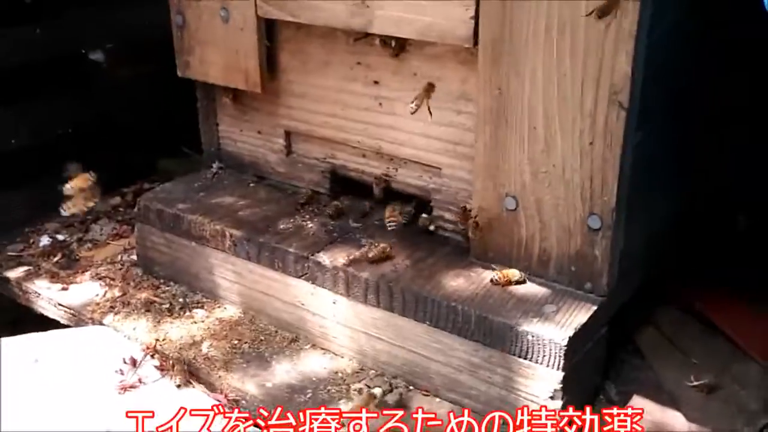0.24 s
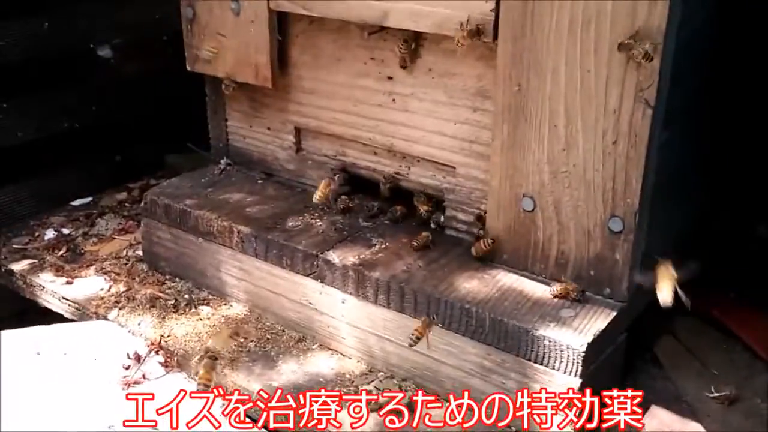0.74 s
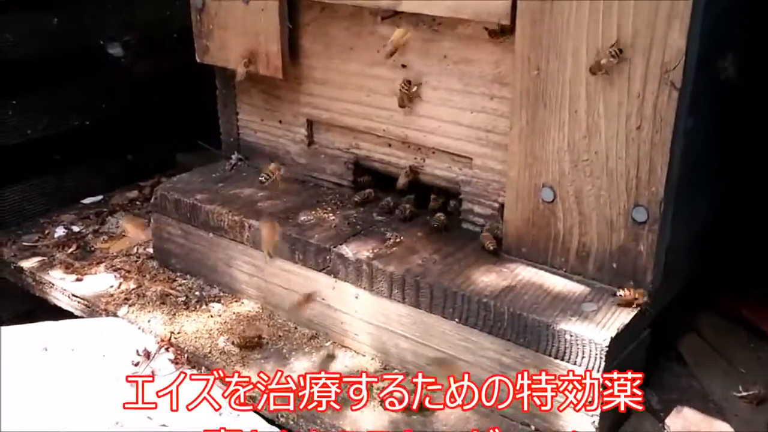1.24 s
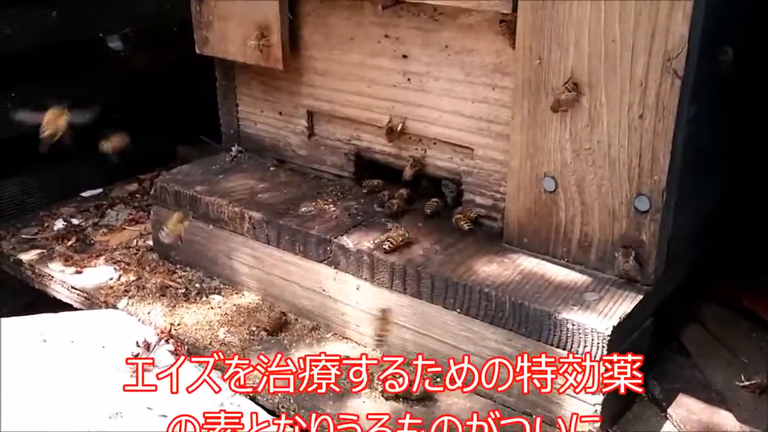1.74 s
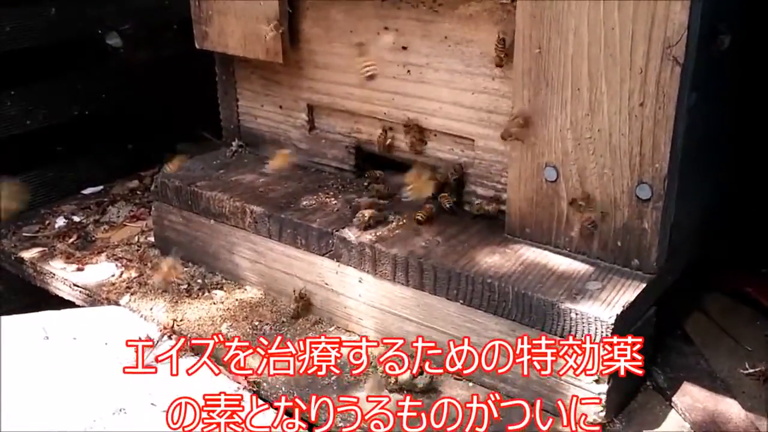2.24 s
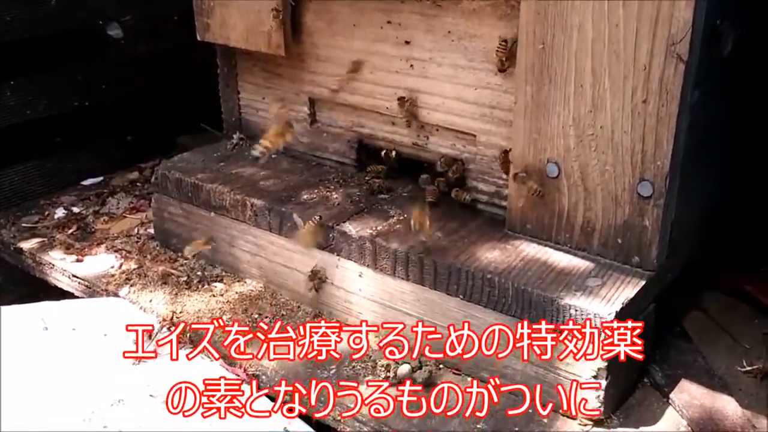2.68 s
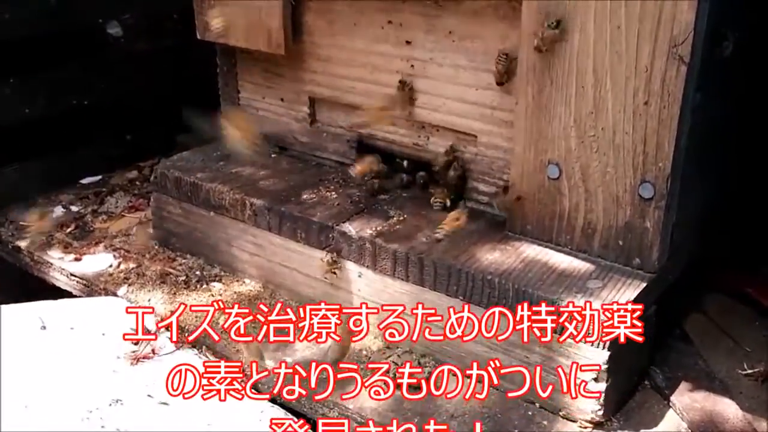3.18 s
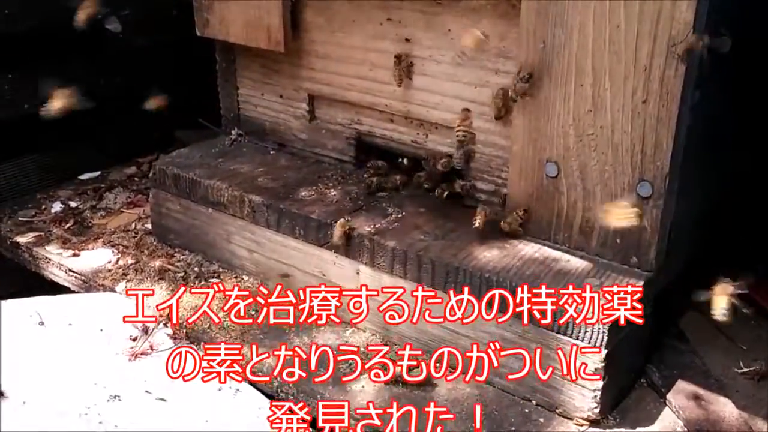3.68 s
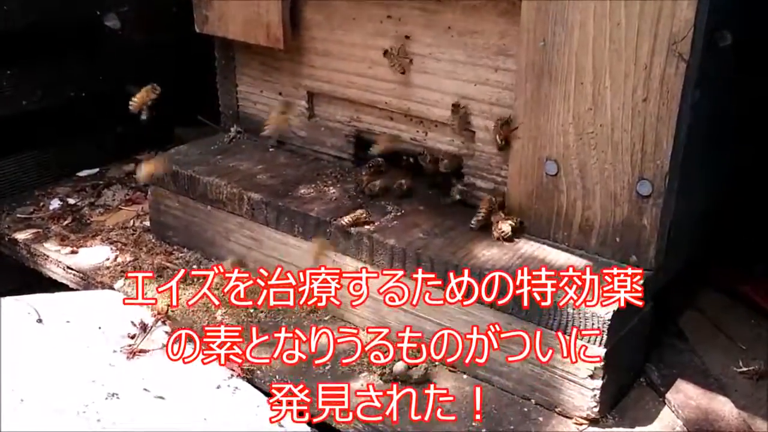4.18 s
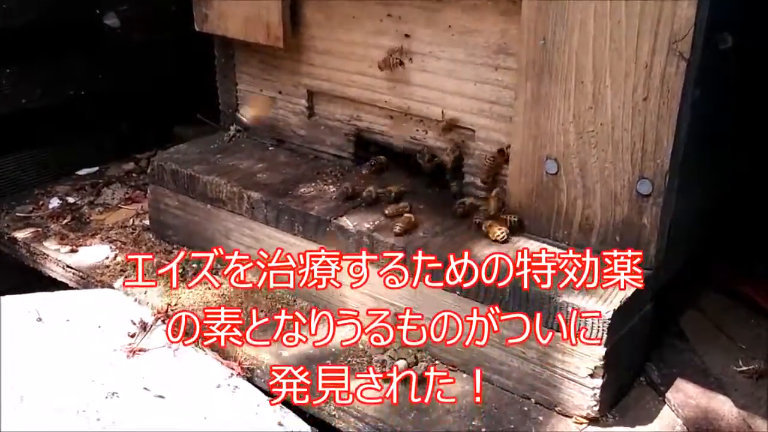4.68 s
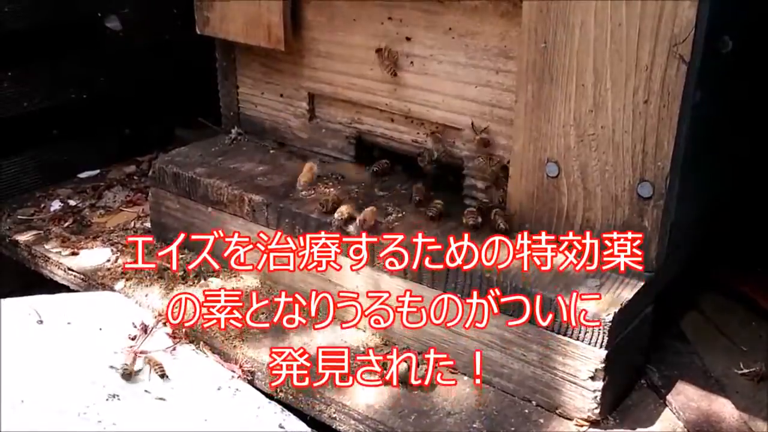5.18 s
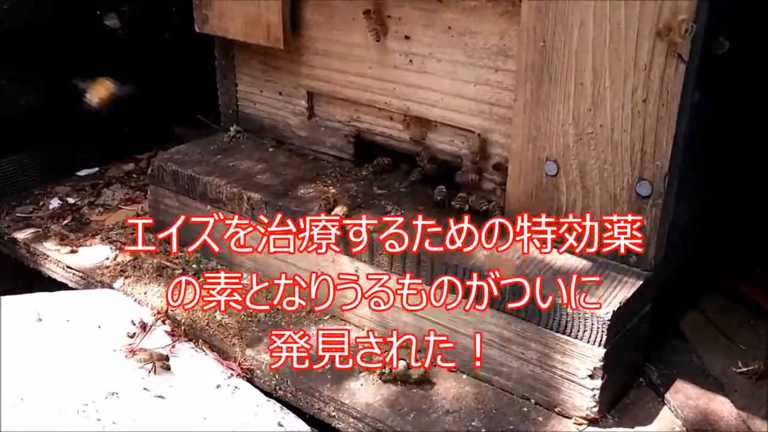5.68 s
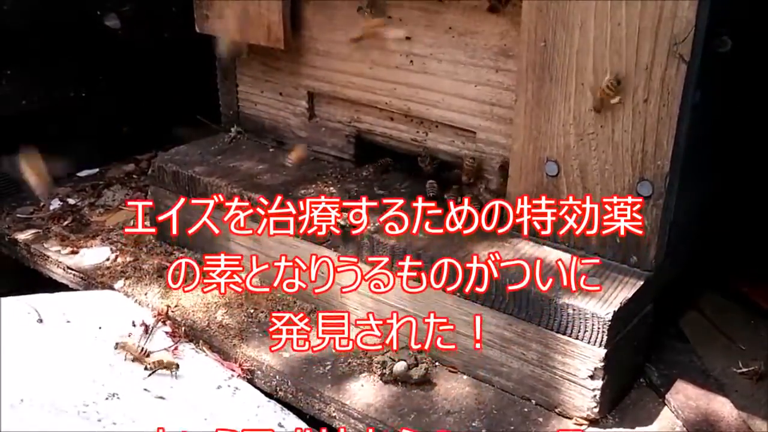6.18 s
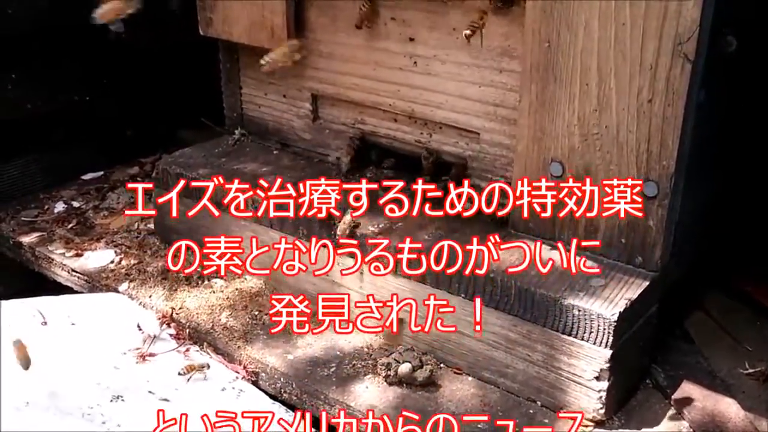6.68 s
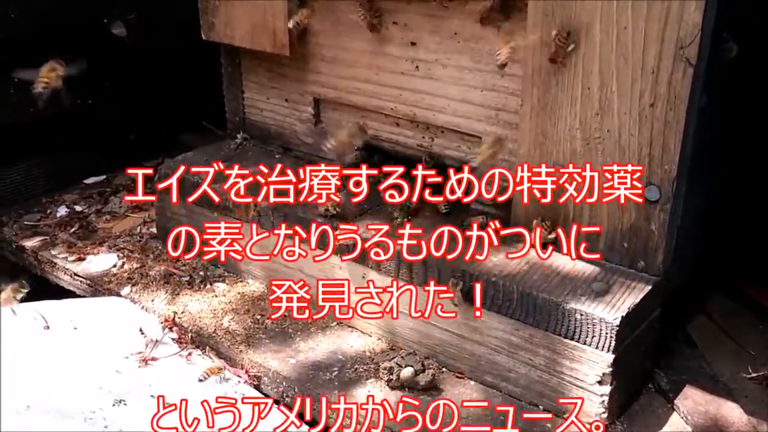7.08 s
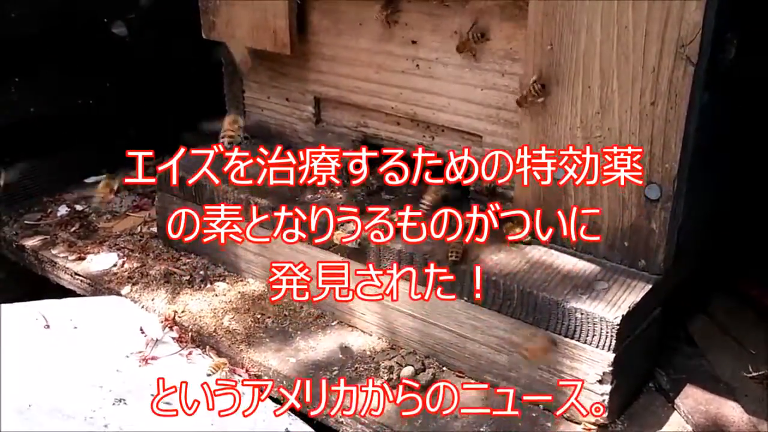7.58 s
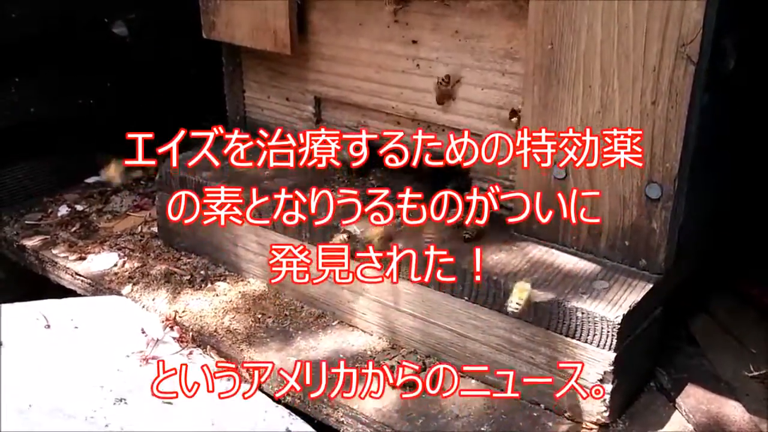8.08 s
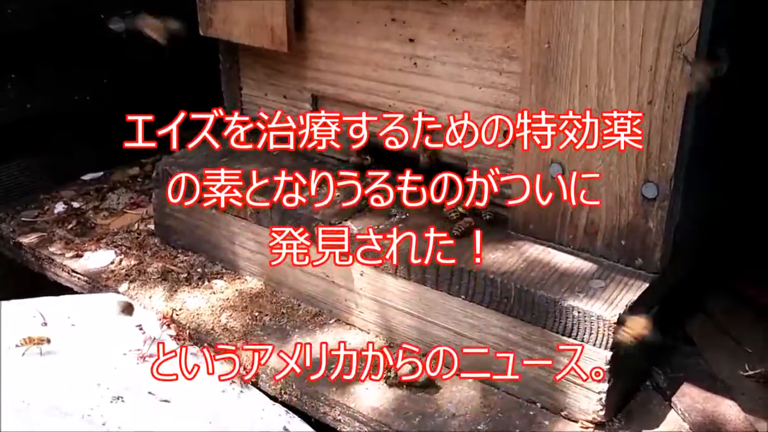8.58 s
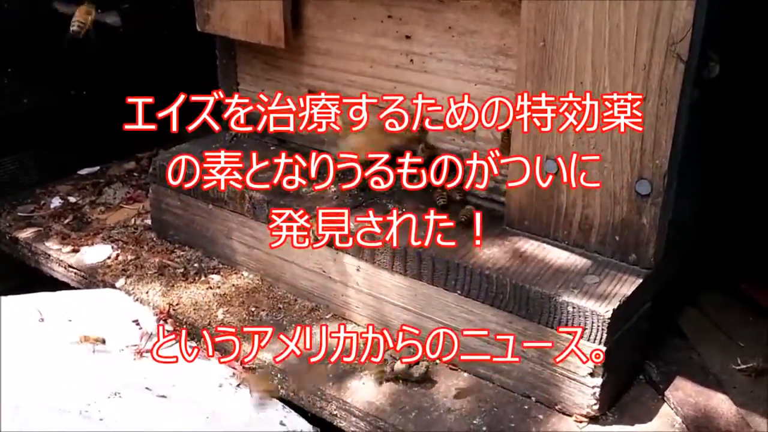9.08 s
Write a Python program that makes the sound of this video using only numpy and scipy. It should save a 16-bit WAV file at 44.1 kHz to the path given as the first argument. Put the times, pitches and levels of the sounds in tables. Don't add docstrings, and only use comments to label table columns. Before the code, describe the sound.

Honeybees hum and hiss around a wooden hive entrance outdoors, thinning to a faint drone before one bee buzzes loudly right past the microphone.

```python
import sys
import numpy as np
from scipy import signal
from scipy.fft import rfft, irfft
from scipy.io import wavfile
from scipy.ndimage import uniform_filter1d

SR = 44100
rng = np.random.default_rng(int(sys.argv[2]) if len(sys.argv) > 2 else 0)


def digitize_waveform(pressure):
    field = np.atleast_2d(pressure).T
    bounded = np.clip(field, -1, 1)
    quanta = np.round(bounded * 32767).astype(np.int16)
    wavfile.write(sys.argv[1], SR, quanta)


def volts(x):
    e = np.asarray(x, float) / 20
    return 10 ** e


N = 411629
T = np.arange(N) / SR


def unit(x):
    return x / np.sqrt(np.mean(x ** 2))


def noise(shape):
    hz, db = np.transpose(shape)
    f = np.arange(N // 2 + 1) * SR / N + 1
    curve_db = np.interp(np.log(f), np.log(hz), db)
    return unit(irfft(rfft(rng.standard_normal(N)) * volts(curve_db), N))


def walk(rate_hz, size=N):
    hold = max(int(SR / rate_hz), 2)
    steps = np.repeat(rng.standard_normal(size // hold + 1), hold)
    return 1.3 * uniform_filter1d(uniform_filter1d(steps, hold), hold)[:size]


def power_sum(*dbs):
    return 10 * np.log10(sum(volts(db) ** 2 for db in dbs))


# time_s, swarm_db, nearest_wings_db
CROWD = [(0, -63.5, -62), (.4, -56.5, -53), (.56, -60, -56.5), (1.1, -60.5, -59.5), (1.45, -60, -57),
         (1.599, -62, -60), (2.2, -63.5, -61.5), (2.38, -71.5, -59.5), (4.3, -79, -68.5),
         (4.52, -75, -64.5), (4.7, -72.5, -59.5), (5.03, -70.5, -60), (5.75, -72.5, -61.5),
         (5.87, -80.5, -74), (6.2, -75.5, -65), (6.58, -75, -60.5), (6.68, -78, -78.5),
         (9.33, -80.5, -78.5)]
# time_s, length_s, hiss_db, drone_against_hiss_db
SWINGS = [(0.343, .06, -64, -13), (0.869, 0.039, -57.5, -18), (2.18, 0.097, -55, -17),
          (5.125, 0.19, -54, -11), (8.35, 0.06, -77, -19), (0.622, 0.07, -59.5, -10),
          (1.38, 0.06, -62, -1.5), (2.35, 0.037, -63.5, -9.5), (4.683, 0.093, -74.5, -12),
          (5.287, 0.22, -59.5, -20), (5.606, .1, -68.5, -8), (5.818, 0.044, -67.5, -11),
          (6.5, 0.074, -78, -15), (7.944, 0.027, -91, 0), (8.995, .1, -82, -7)]
# start_s, length_s, level_db, change_to_end_db
GUSTS = [(0, 0.26, -53, 1.5), (0.331, 0.2, -45, -3.5), (0.585, 0.1, -50, 0.5), (0.757, 0.25, -51.5, 0.5),
         (1.052, 0.24, -50, -6.5), (1.32, 0.23, -52, -3), (1.638, 0.27, -55, 0.5), (2.016, 0.1, -56, 2.5),
         (2.17, 0.13, -73.5, 2), (2.5, 0.075, -73, -1.5), (4.44, 0.09, -75, 0), (5.094, 0.17, -63, -0.5),
         (5.25, 0.15, -66.5, -7), (5.682, 0.15, -65, -1.5), (6.114, .19, -58.5, -13),
         (6.82, 0.067, -72.5, 4), (7.888, 0.093, -53, -16.5), (8.315, 0.052, -75, 0),
         (8.73, 0.076, -65.5, 1.5), (8.822, 0.18, -67, -5), (9.06, 0.13, -63, 1), (9.245, 0.091, -63.5, -1)]


def crowd_levels():
    gust_edge_s, lull_offset_db, calm_db = .051, -10.5, -77.5
    s, swarm_db, wings_db = np.transpose(CROWD)
    swarm_db, wings_db = np.interp(T, s, swarm_db), np.interp(T, s, wings_db)
    drone_dbs, hiss_dbs, gust_dbs = [swarm_db], [wings_db], []
    for at, length, db, drone_rel_db in SWINGS:
        near_db = db - 20 * ((T - at) / length) ** 2
        hiss_dbs.append(near_db)
        drone_dbs.append(near_db + drone_rel_db)
    for at, length, db, change_db in GUSTS:
        outside_s = np.maximum(np.maximum(at - T, T - at - length), 0)
        gust_db = db + change_db * (T - at) / length - 20 * outside_s / gust_edge_s
        gust_dbs.append(np.clip(gust_db, -200, 0))
    gust_db = power_sum(*gust_dbs)
    hum_db = power_sum(swarm_db + 3, gust_db - 2) + .5 * walk(9.2)
    lull_db = 2 * swarm_db - swarm_db[0] + lull_offset_db
    return hum_db, power_sum(*drone_dbs), power_sum(*hiss_dbs), power_sum(gust_db, lull_db, calm_db)


SWARM_PARTIALS = [-2, 0, -14, -15, -11.5, -18, -15.5, -25.5, -30]


def swarm(count=12):
    hum, upper, strokes = 0, 0, 0
    for hz in np.linspace(200, 275, count):
        phase = 2 * np.pi * np.cumsum(hz * (1 + .035 * walk(3) + .007 * walk(25))) / SR
        near = volts(5.5 * walk(4))
        partials = [near * volts(db) * np.cos((k + 1) * phase) for k, db in enumerate(SWARM_PARTIALS)]
        hum = hum + sum(partials[:2])
        upper = upper + sum(partials[2:])
        strokes = strokes + near ** 2 * np.exp(np.cos(phase))

    def steady(power):
        return uniform_filter1d(power, SR // 4)

    return hum / np.sqrt(steady(hum ** 2)), upper / np.sqrt(steady(upper ** 2)), np.sqrt(strokes / steady(strokes))


# frequency_hz, level_db
HISS = [(1180, -39.5), (2000, -18), (2360, -10.5), (2750, -14), (3500, -21.5), (4500, -18), (8520, -0.5),
        (9780, 1), (11600, 1), (15700, -9.5)]
# frequency_hz, level_db
WING_EDGE = [(2500, -17.5), (4200, 0.5), (5200, 2), (6500, -2.5), (8000, -27)]
# frequency_hz, level_db
DRONE = [(100, -34), (240, -11), (360, -13), (480, -14.5), (800, -11), (1200, -12.5), (1750, -9.5),
         (2050, -15), (3500, -15), (6000, -17), (8000, -38.5)]
# frequency_hz, level_db
BREEZE = [(15, -1), (40, 2.5), (90, -2.5), (160, -14), (300, -15.5), (700, -35.5)]


def crowd():
    hum, upper, strokes = swarm()
    hum_db, drone_db, hiss_db, breeze_db = crowd_levels()
    hiss = noise(HISS) * strokes * volts(hiss_db + .5 + .19 * walk(5.9))
    hiss += noise(WING_EDGE) * strokes * volts(hiss_db - 20.5 + 3.7 * walk(.57))
    blur = noise(DRONE) * volts(-1.5 + .81 * walk(15))
    drone = (blur + upper * volts(-.5)) * volts(drone_db)
    breeze = noise(BREEZE) * volts(breeze_db - .5 + 1.6 * walk(20))
    return hum * volts(hum_db - 7) + drone + hiss + breeze


# multiple_of_beat, level_against_eighth_db
OVERTONES = [(6, -2), (7, 1), (8, 2), (9, -1), (10, -6), (11, -12), (12, -13), (13, -13), (14, -14),
             (15, -15), (16, -16)]


def bee(s, beat_hz, first_db, second_db, third_db, fifth_db, eighth_db, wobble=.007, flutter_db=1.3):
    span = slice(int(s[0] * SR), min(int(s[-1] * SR), N))
    t = T[span]
    hz = np.interp(t, s, beat_hz) * (1 + wobble * walk(60, size=len(t)))
    phase = 2 * np.pi * np.cumsum(hz) / SR
    curves = (first_db, second_db, third_db, fifth_db, eighth_db)
    first, second, third, fifth, eighth = (np.interp(t, s, curve) for curve in curves)
    parts = [(1, first), (2, second), (3, third), (4, (third + fifth) / 2 - 5), (5, fifth)]
    parts += [(round(k), db + eighth) for k, db in OVERTONES]
    skew = .7
    hum = 0
    for k, db in parts:
        flutter = flutter_db * np.sqrt(k) * walk(45.9, size=len(t))
        hum = hum - volts(db + flutter) * np.cos(k * phase + skew)
    fade_s = .05
    since_start = t - s[0] + (s[0] == 0)
    fade = np.clip(np.minimum(since_start, s[-1] - t) / fade_s, 0, 1)
    return span, phase, np.sqrt(2) * hum * fade


# start_s, length_s, start_pitch_hz, end_pitch_hz, level_db
FAR = [(.18, 0.46, 219.4, 227, -58), (1.551, 0.4, 238.5, 228, -75), (4.3, 0.32, 237.5, 245, -84),
       (5.12, 0.31, 207, 186, -76), (5.42, 0.25, 247, 238, -80), (6.4, 0.56, 203, 196, -100),
       (6.98, 0.3, 234, 250.3, -84), (8.1, 0.225, 241.5, 248.5, -79), (8.24, 0.2, 247, 218, -81.5),
       (8.34, 0.237, 216.8, 226.5, -77), (8.5, 0.19, 226, 246, -84.5), (8.6, 0.26, 242, 234, -80),
       (9.05, 0.38, 251.3, 265, -86)]
# start_s, length_s, start_pitch_hz, end_pitch_hz, level_db
EDGE_ON = [(.03, 0.26, 254.3, 224, -62), (.2, 0.16, 210.4, 238, -49), (0.371, 0.14, 220.2, 252, -47.5),
           (.48, 0.32, 236.4, 242.6, -57.5), (.92, 0.23, 247, 237, -63.5), (1.05, 0.35, 273.6, 299, -62),
           (1.319, 0.24, 208, 213.3, -62), (1.622, 0.2, 243.5, 214, -57.5), (1.75, 0.18, 220.6, 241, -62),
           (2.099, 0.25, 241, 220.5, -65.5), (2.261, 0.14, 275.6, 236, -68.5), (2.36, 0.45, 234, 229, -73),
           (3.45, 0.3, 203.4, 200.6, -79.5), (3.9, 0.26, 218, 238, -80.5), (4.9, 0.22, 245.5, 241.5, -75),
           (5.16, .3, 243.3, 221, -63.5), (5.581, 0.26, 230.2, 200, -64), (8.3, .25, 238.5, 238.7, -80.5),
           (6.2, 0.19, 253, 237, -88), (6.6, 0.31, 246, 238, -79), (7.2, 0.19, 236.6, 248, -79),
           (8.75, 0.26, 237, 252, -78), (9.1, 0.21, 283, 294, -81)]
# start_s, length_s, start_pitch_hz, end_pitch_hz, level_db
ABOVE = [(0, 0.255, 242.8, 240, -61.5), (.3, 0.13, 234.6, 200, -52.5), (0.453, 0.26, 236.4, 248, -59),
         (.68, 0.31, 230, 260, -59), (1.33, 0.26, 248.9, 236, -64), (1.64, 0.27, 239, 310, -66),
         (1.9, 0.26, 241.6, 240, -70.5), (3.046, 0.25, 237, 310, -94), (3.599, 0.27, 229, 236, -85.5),
         (4.799, 0.35, 246.7, 233, -76.5), (5.02, 0.29, 241, 241, -63.5), (6.093, 0.24, 237, 245, -82),
         (6.497, 0.27, 238.7, 236, -86), (6.77, 0.15, 233, 260, -83), (7.1, 0.4, 238, 293, -86.5),
         (7.859, 0.14, 239, 240, -71), (8.7, 0.43, 238, 245, -82.5), (9.048, 0.31, 226, 230, -79.5)]
# first_db, third_db, fifth_db, eighth_db
VIEWS = [
    (6, -5, -13.5, -26.5),
    (-3, -16, -14.5, -21.5),
    (-3, -15, -5, -13.5),
]


def visitors():
    recede_db, veer_db, turn_db, wander = 13, 1.2, 2, .008
    out, way = np.zeros(N), np.linspace(0, 1, num=9)
    for flights, view in zip((ABOVE, EDGE_ON, FAR), VIEWS):
        first_db, third_db, fifth_db, eighth_db = view
        for at, length, hz, end_hz, db in flights:
            turn, stray, veer = rng.standard_normal((3, len(way)))
            near_db = db - recede_db * (2 * way - 1) ** 2 + veer_db * veer
            beat_hz = (hz + (end_hz - hz) * way) * (1 + wander * stray)
            span, _, hum = bee(at + length * way, beat_hz, near_db + first_db + turn_db * turn, near_db,
                               near_db + third_db, near_db + fifth_db, near_db + eighth_db)
            out[span] += hum
    return out


# time_s, peak_db, surface_index, crack_against_ring_db
KNOCKS = [
    (4.422, -62, 0, -16),
    (4.428, -51, 0, -11),
    (4.53, -64, 0, -10),
    (5.0553, -36, 1, -11),
    (5.0592, -43, 0, -14),
    (6.0985, -58, 2, -22),
    (6.0998, -45, 2, -27),
    (6.1146, -45, 2, -34),
    (6.135, -57, 2, -30),
]
# frequency_hz, level_db, t60_s
SURFACES = [
    [(344, -0.5, 0.093), (620, -9, 0.029), (905, -11, 0.04), (1726, -6.5, 0.04), (2420, -15, .015)],
    [(391, 0, 0.31), (650, 2, .06), (975, -6, 0.13), (1760, -15, 0.025), (2100, -16, 0.027),
     (2450, 8.5, 0.022), (3185, -1, 0.052)],
    [(148, -24, .06), (500, 0, .013), (1150, -9, .006), (2200, -18, .004)],
]
# frequency_hz, level_db
CRACK = [(500, -17), (1500, 16), (2600, 12.5), (4500, 6), (6000, -21)]


def knocks():
    out, t, splinter = np.zeros(N), T[:SR // 5], noise(CRACK)
    for at, db, surface, crack_db in KNOCKS:
        ring = 0
        for hz, mode_db, t60 in SURFACES[round(surface)]:
            decay = np.exp(-np.log(1000) * t / t60)
            ring = ring + volts(mode_db) * decay * np.sin(2 * np.pi * hz * t)
        span = slice(int(at * SR), int(at * SR) + len(t))
        crack = volts(crack_db) * splinter[span] * np.exp(-t / .007)
        out[span] -= volts(db) * (ring / np.abs(ring).max() + crack)
    return out


# time_s, peak_db,
# frequency_hz, length_s
THUMPS = [(0.343, -32.5, 110.1, 0.0065), (0.358, -38, 45, 0.013), (6.109, -49, 111, .006),
          (6.124, -54, 80, .007), (6.142, -55, 60, .008), (7.668, -24, 70, 0.015),
          (7.692, -30.5, 86, 0.013), (7.699, -10.5, 89.5, .01), (7.709, -13.5, 95, .004),
          (7.715, -24.5, 70, 0.0067), (7.737, -12.5, 65.1, 0.008), (7.783, -25.5, 60, 0.0086)]


def thumps():
    out = np.zeros(N)
    for at, db, hz, length in THUMPS:
        out += volts(db) * np.exp(-((T - at) / length) ** 2) * np.cos(2 * np.pi * hz * (T - at))
    return out


# time_s, pitch_hz, second_partial_db, facing_db (first over second partial), torn_air_db
PASS = [
    (7.5, 190.5, -81.5, 1, -100),
    (7.611, 209.6, -43.5, 2.5, -69),
    (7.642, 233.2, -36.5, 5.5, -49.5),
    (7.687, 220, -28.5, -15.5, -49),
    (7.739, 214.5, -26.5, 2, -40),
    (7.8, 201, -28, 6.5, -48.5),
    (7.855, 217, -40, 4.5, -59.5),
    (7.91, 194.4, -58, -10, -67.5),
    (8.08, 186.5, -81.5, 1, -100),
]
# level_at_nearest_db, loss_per_db_of_distance, change_per_db_of_facing
LAYERS = dict(third=(-37, 1.7, .15), fifth=(-45.5, 1.3, .1), eighth=(-56.5, 1.35, -.08),
          wake=(-26, .8, -.21))
# frequency_hz, level_db
RUSTLE = [(300, -10), (600, -0.5), (1200, -7), (1800, -15), (2400, -31.5), (3400, -15.5), (4500, -17),
          (6500, -19.5)]
# frequency_hz, level_db
WAKE = [(20, -5), (60, 2), (110, -13.5), (200, -2.5), (500, -21.5), (1500, -50.5), (4000, -40.5)]


def close_pass():
    nearest_db, wash_s, wash_length_s, wash_db = -25, 7.695, .031, -19.5
    out = np.zeros(N)
    s, beat_hz, near_db, facing_db, air_db = np.transpose(PASS)
    layer = {}
    for name, (db, slope, turn) in LAYERS.items():
        layer[name] = db + slope * (near_db - nearest_db) + turn * facing_db
    span, phase, hum = bee(s, beat_hz, near_db + facing_db, near_db, layer["third"], layer["fifth"],
                           layer["eighth"], wobble=.004, flutter_db=1.0)
    t = T[span]
    puff = np.interp(t, s, np.clip(.75 + facing_db, 0, 1))
    puffs = np.exp(puff * (np.cos(phase + .69) - .6)) * volts(1.45 * walk(151.5, size=len(t)))
    torn_db = np.interp(t, s, air_db)
    air = noise(HISS)[span] * volts(torn_db) + noise(RUSTLE)[span] * volts(torn_db - 3.5)
    downwash_db = wash_db - 10 * ((t - wash_s) / wash_length_s) ** 2
    wake_db = power_sum(np.interp(t, s, layer["wake"]), downwash_db)
    out[span] = hum + air * puffs + noise(WAKE)[span] * volts(wake_db - 6.5)
    return out


def scene():
    return (crowd() + visitors() + knocks() + thumps() + close_pass())[None]


# middle_s, frames_in_a_row, lowest_lost_hz
DROPOUTS = [(.858, 2, 550), (1.188, 1, 1900), (1.401, 1, 650), (1.509, 1, 600), (2.297, 1, 600),
            (2.918, 1, 150), (3.451, 1, 150), (3.599, 1, 500), (3.77, 1, 300), (4.729, 1, 1150),
            (4.772, 1, 900), (6.829, 2, 700), (7.103, 2, 300), (7.192, 2, 400), (7.267, 1, 900),
            (7.331, 1, 600), (7.501, 1, 600), (8.033, 1, 600), (8.162, 1, 600), (8.419, 1, 700),
            (8.931, 1, 1250), (9.144, 1, 1500), (9.229, 1, 800)]


def dropouts(x, size=1882):
    out = x.copy()
    window = np.sin(np.pi * np.arange(size) / size)
    hz = np.arange(size // 2 + 1) * SR / size
    margin = 2.3 - 1500 / (hz + 1000)
    for at, frames, low_hz in DROPOUTS:
        lost_band = (hz > low_hz) & (hz < 14800)
        for k in range(frames):
            start = int(at * SR + (k - (frames + 1) / 2) * size / 2)
            lines = rfft(x[start:start + size] * window)
            around = np.sqrt(uniform_filter1d(np.abs(lines) ** 2, 41))
            weak = np.abs(lines) < margin * around
            lost = irfft(lines * np.where(weak, 1, -.6) * lost_band, size)
            early, late = np.split(lost, 2)
            out[start:start + size] -= window * np.r_[early - early[::-1], late + late[::-1]]
    return out


# frequency_hz, level_db
SELF_NOISE = [(20, 1.5), (60, 1.5), (150, -8.5), (400, -11), (1200, -19.5), (2100, -20.5), (4000, -22),
              (9000, -20.5), (15700, -24)]


def microphone(air):
    return air + noise(SELF_NOISE) * volts(-75)


def top_cut(x):
    return signal.sosfilt(signal.butter(12, 15730, fs=SR, output="sos"), x)


def record(dry):
    mix = dropouts(microphone(dry[0])) - .00043
    return top_cut(mix[None])


dry = scene()
out = record(dry)
digitize_waveform(out)
```